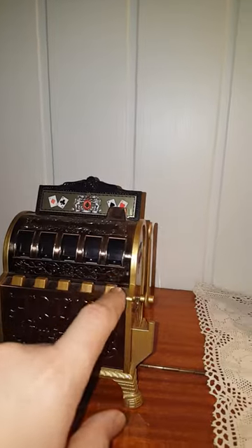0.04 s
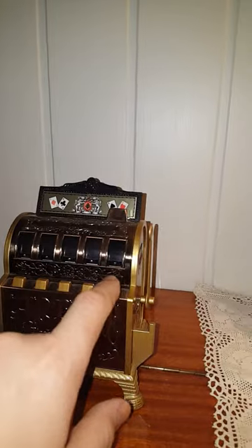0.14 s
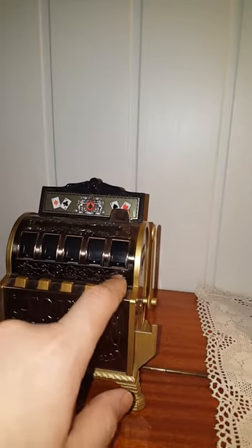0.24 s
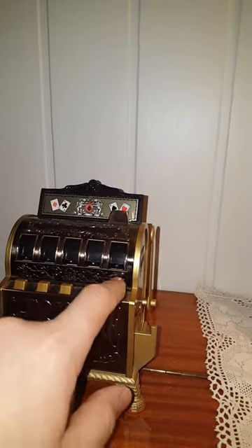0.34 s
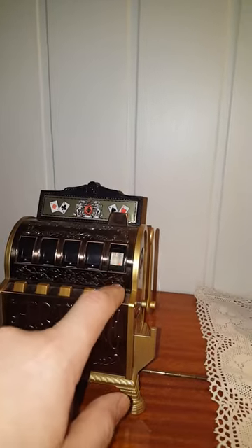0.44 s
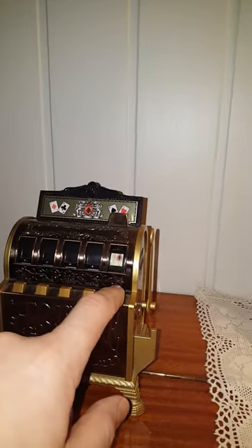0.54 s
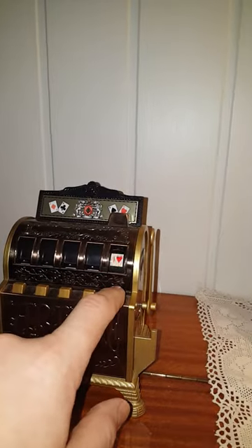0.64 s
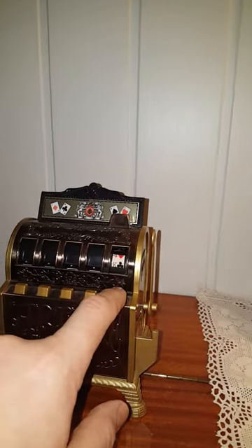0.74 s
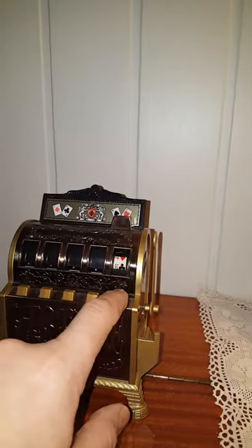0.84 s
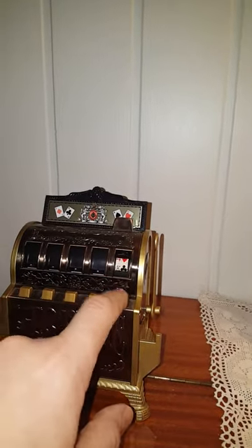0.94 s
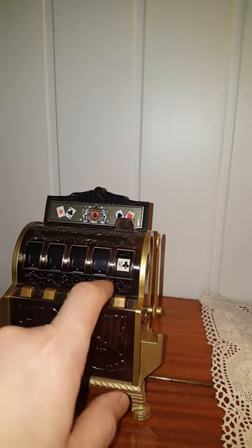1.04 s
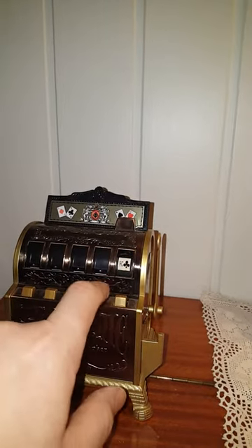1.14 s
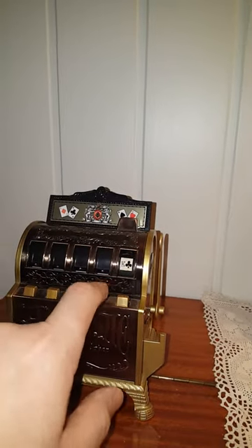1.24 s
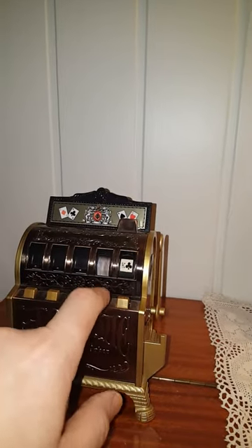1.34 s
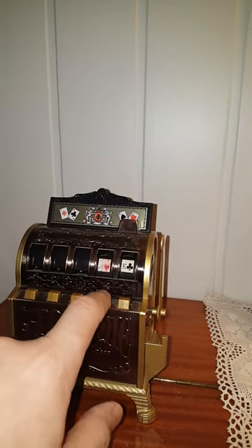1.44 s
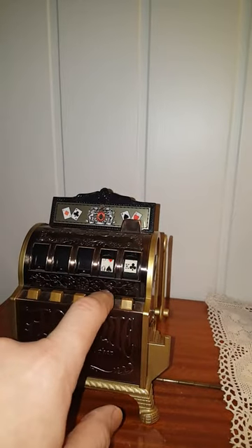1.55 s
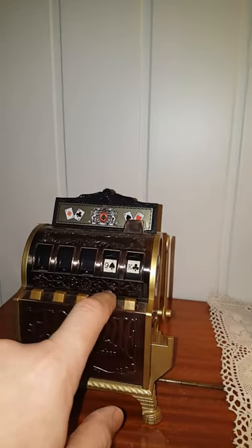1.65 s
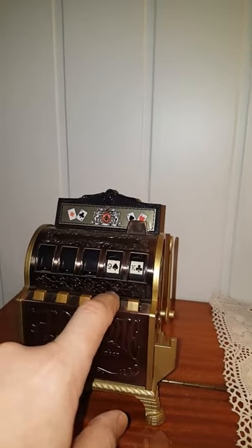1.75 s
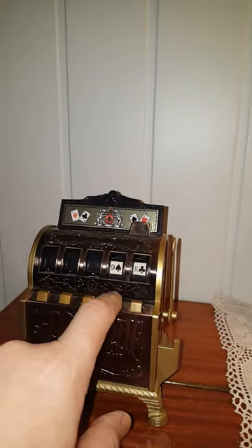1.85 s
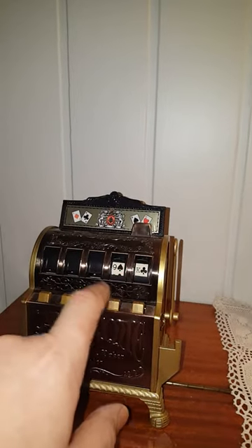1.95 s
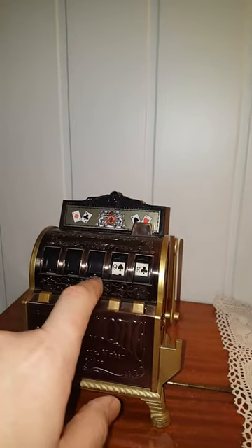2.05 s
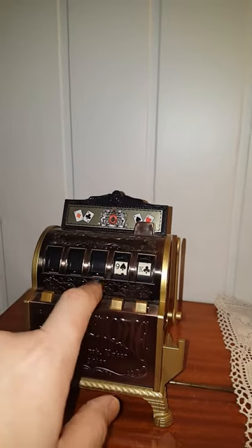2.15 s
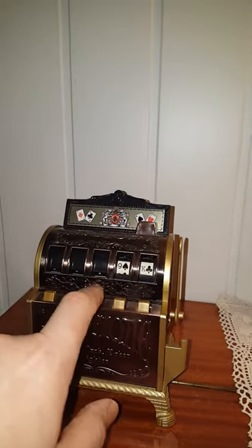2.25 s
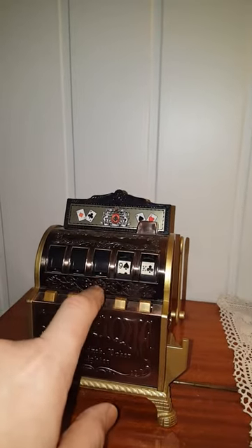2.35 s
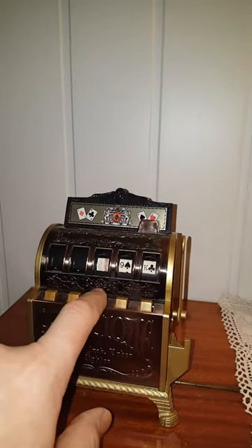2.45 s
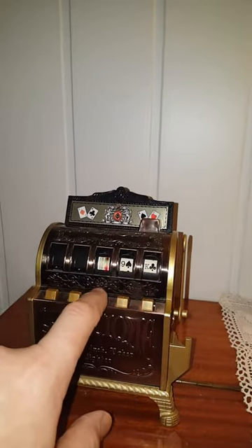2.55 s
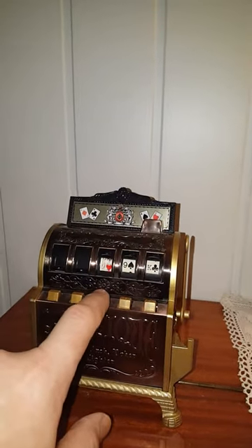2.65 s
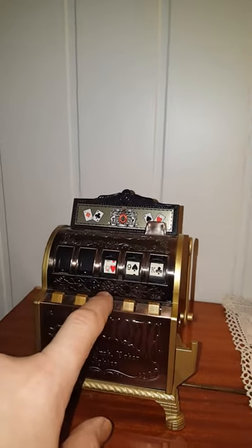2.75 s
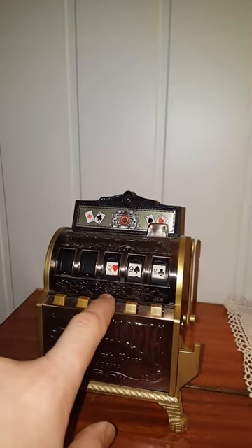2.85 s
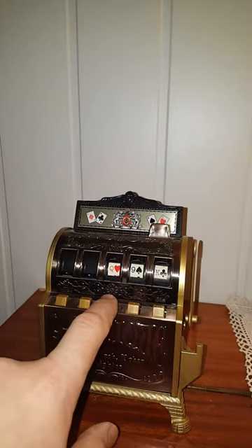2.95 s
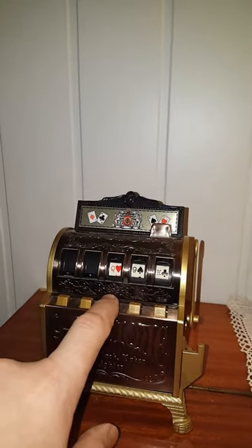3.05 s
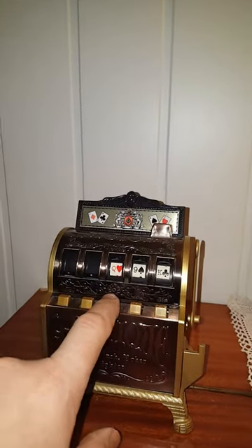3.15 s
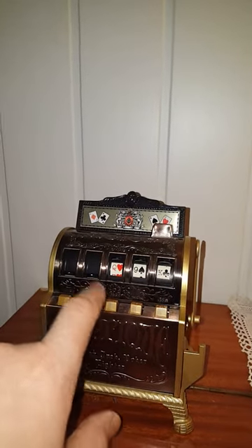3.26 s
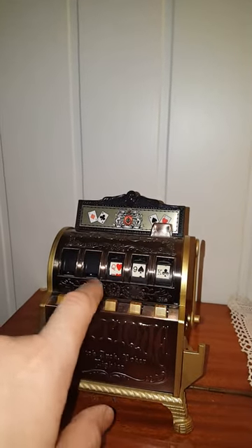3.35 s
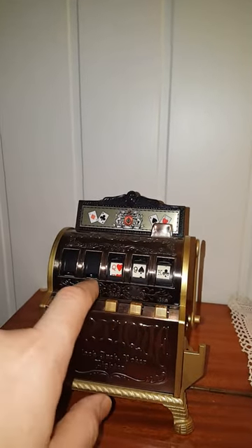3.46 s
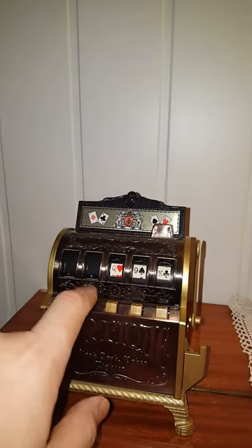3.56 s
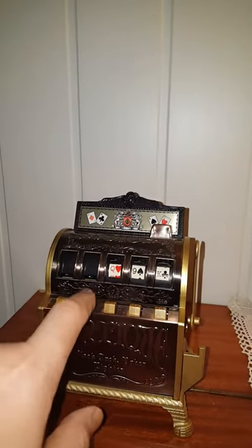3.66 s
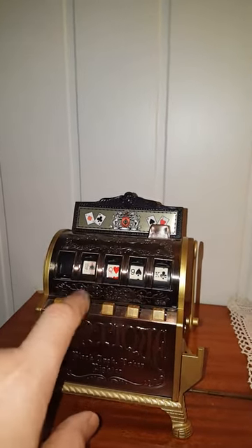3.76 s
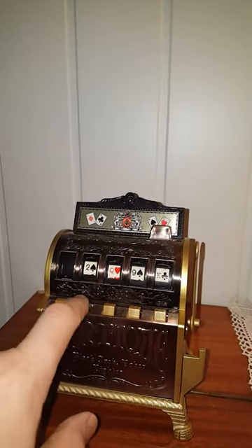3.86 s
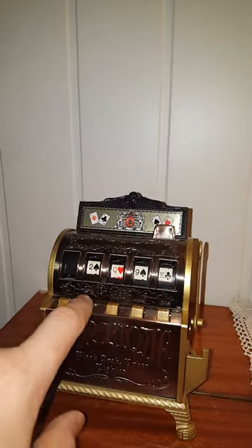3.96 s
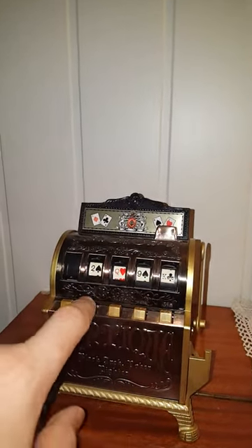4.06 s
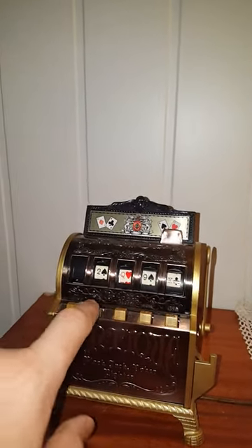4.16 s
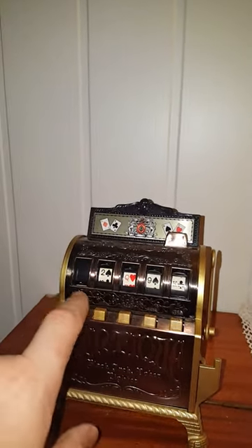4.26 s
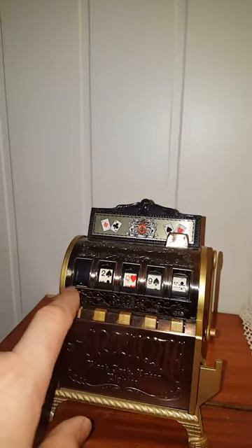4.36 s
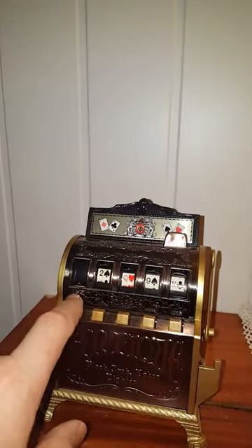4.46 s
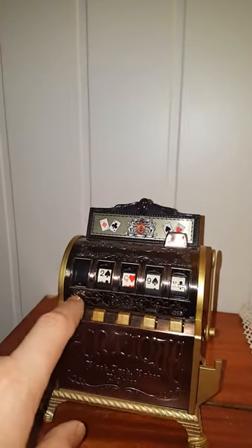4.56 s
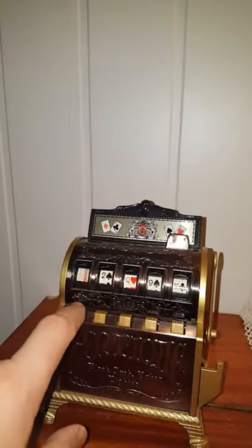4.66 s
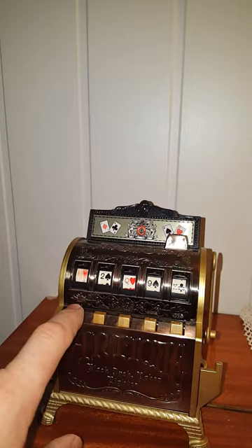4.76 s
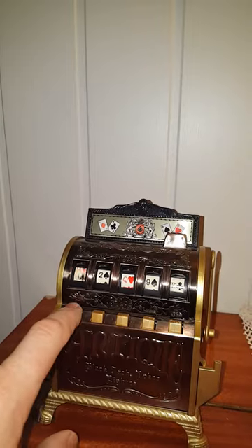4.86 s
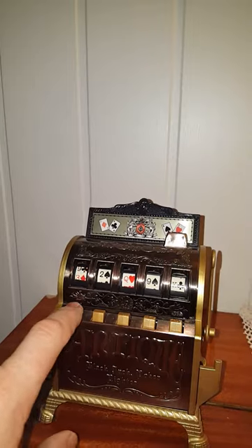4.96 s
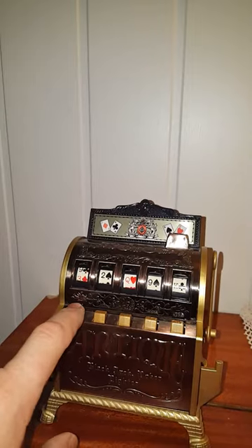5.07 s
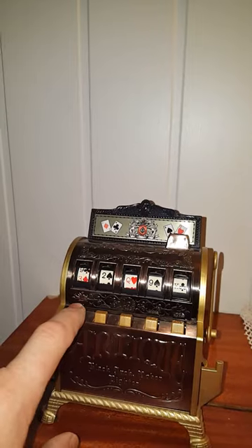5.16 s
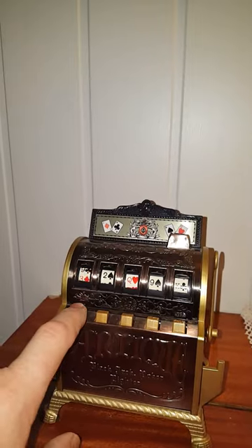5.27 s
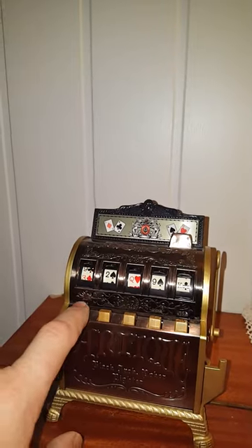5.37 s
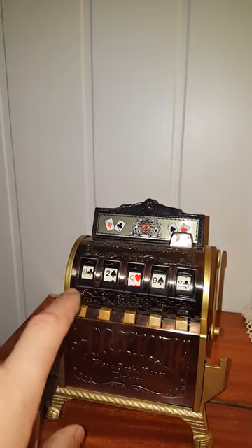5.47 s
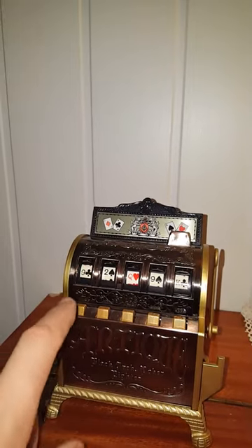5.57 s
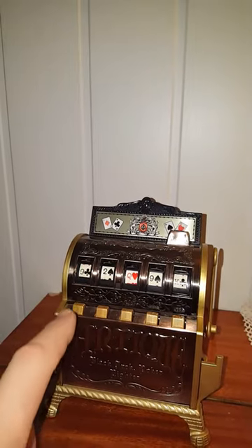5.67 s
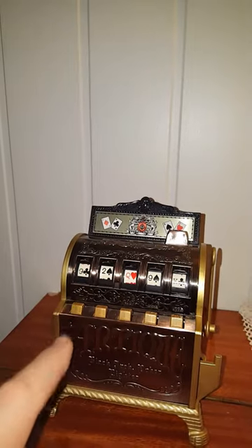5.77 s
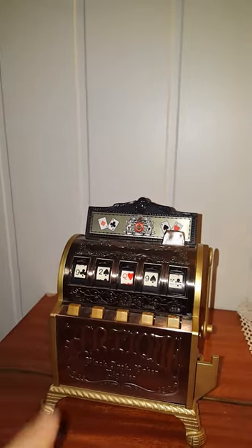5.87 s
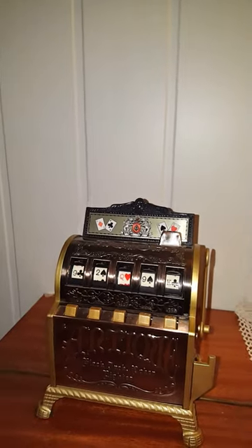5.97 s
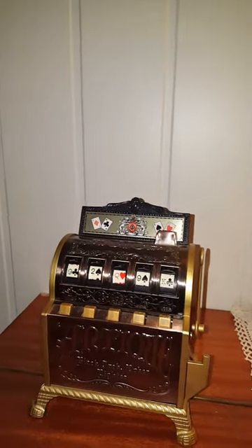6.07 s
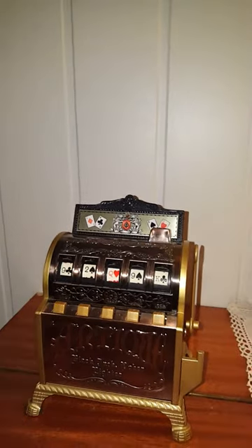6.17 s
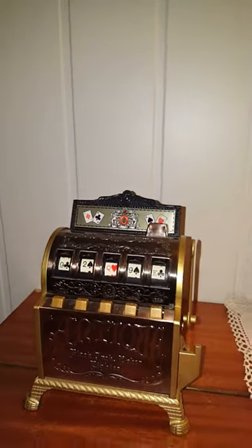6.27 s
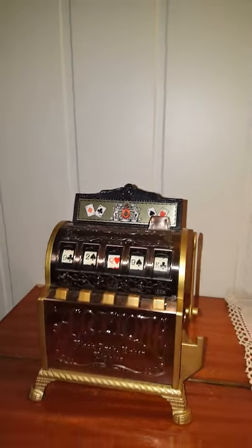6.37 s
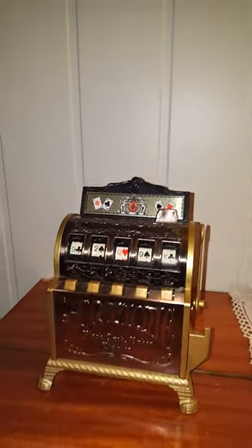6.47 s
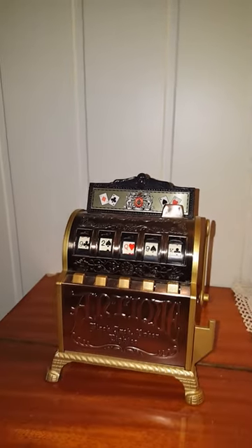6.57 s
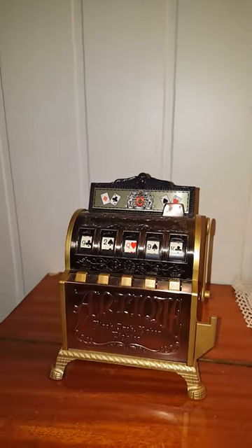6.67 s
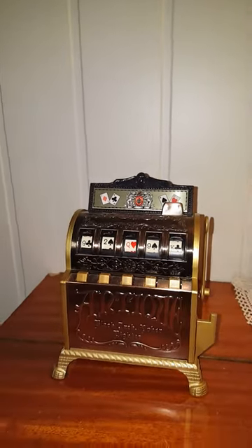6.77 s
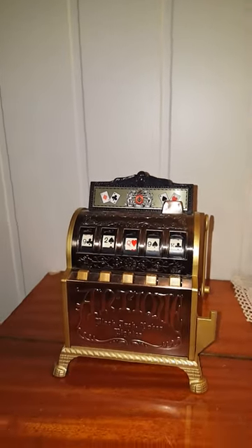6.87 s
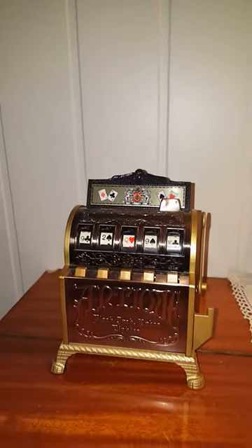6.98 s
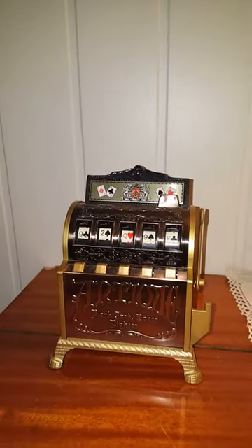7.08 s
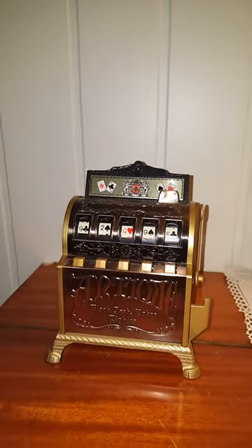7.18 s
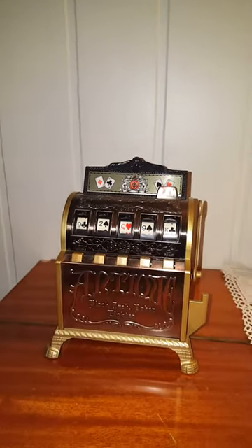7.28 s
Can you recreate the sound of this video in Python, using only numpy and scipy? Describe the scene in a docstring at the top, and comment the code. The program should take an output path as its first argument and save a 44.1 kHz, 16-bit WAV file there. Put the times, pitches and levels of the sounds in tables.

```python
"""In a small, quiet room, a toy poker machine stands on a wooden table. A finger presses its five
buttons in turn. Each press ticks, then a spring latch snaps and flicks a card reel into a rattling
spin; the button clacks back and stops it. The hollow case and the table top ring briefly.
A soft knock and a tiny tick follow.
In the tables, "fade" is the time a sound takes to die away by 60 dB."""
import sys
import numpy as np
from scipy import signal
from scipy.fft import rfft, irfft, next_fast_len
from scipy.io import wavfile
from scipy.ndimage import uniform_filter1d

SR = 44100
rng = np.random.default_rng(int(sys.argv[2]) if len(sys.argv) > 2 else 0)


def wav_record(signal):
    """Record a signal, one row per channel, as 16-bit PCM in the file named by sys.argv[1]."""
    frames = np.transpose(np.atleast_2d(signal))
    bounded = np.clip(frames, -1, 1)
    # unit amplitude maps onto the largest positive 16-bit level
    quanta = np.round(bounded * 32767).astype(np.int16)
    wavfile.write(sys.argv[1], SR, quanta)


N = 322949


# Button presses: snap t/s, level/dB, bass boost/dB, treble boost/dB, finger lands earlier by t/s,
# pawl level/dB, rebound delay t/s, rebound against the snap/dB
LATCH_SNAPS = [(0.4644, -16, -3, 2.5, .014, -37.5, 0.0049, -11),
               (1.3925, -18, -2, 6, .0395, -34.5, 0.013, -9.5),
               (2.423, -18.5, -8, 2.5, 0.028, -30.5, .0052, 0.5),
               (3.7252, -14.5, 0, 2.5, .031, -39.5, .0113, -5),
               (4.6899, -13.5, 0.5, 2, 0.023, -36.5, .0095, -6.5)]

def press_contacts():
    """The finger lands, the pawl (a small catch) slips, then the latch snaps and rebounds."""
    for s, db, bass_db, treble_db, touch_s, pawl_db, rebound_s, rebound_db in LATCH_SNAPS:
        # each contact: t/s, level/dB, bass boost/dB, treble boost/dB, fade/s
        yield s - touch_s, -43, -2, -8, .057  # finger
        yield s - .0128, pawl_db, -3, 0, .028  # pawl
        yield s, db, bass_db, treble_db, .032  # snap
        yield s + rebound_s, db + rebound_db, bass_db, treble_db, .032


# Button releases: clack t/s, level/dB, bass boost/dB, treble boost/dB, unsticks earlier by t/s,
# unsticking level/dB, seating delay t/s, seating against the clack/dB, seating fade/s
BUTTON_CLACKS = [(1.0405, -39, 4.5, -11.5, .043, -44, 0.021, -3, .06),
                 (1.946, -42.5, 2.5, -5, .012, -54, .016, 0, .1),
                 (3.256, -39.5, -0.5, -7, .023, -52.5, 0.02, -1, .05),
                 (4.244, -45, 2, -3.5, .009, -56.5, 0.012, -3, .032),
                 (5.453, -40, 1.5, 2, .057, -60, 0.028, 0, .11)]
# A button coming unstuck: bass boost/dB, treble boost/dB, fade/s
UNSTICK_TONE = (3, -7.5, .04)

def release_contacts():
    """The button comes unstuck, clacks back and settles into its seat with a duller chatter."""
    for s, db, bass_db, treble_db, unstick_s, unstick_db, seat_s, seat_db, seat_fade_s in BUTTON_CLACKS:
        yield s - unstick_s, unstick_db, *UNSTICK_TONE
        yield s, db, bass_db, treble_db, .043  # clack
        yield s + seat_s, db + seat_db, bass_db + 4, treble_db - 6, seat_fade_s


# Lone ticks of loose parts: t/s, level/dB, bass boost/dB, treble boost/dB
LOOSE_TICKS = [(1.139, -61, 10, -12.5), (2.031, -59, 5, -8.5), (3.808, -37.5, 2, 6.5), (4.003, -63, 1, -8),
               (6.286, -70, 0, 14.5)]

def buttons(tick_fade_s=.033):
    """Each contact pushes the case once, shakes the button and makes the loose parts chatter."""
    force, t = np.zeros((2, N)), np.arange(SR // 8) / SR
    push = soft_filter(1. * (t == 0), 1200, "low")
    ticks = [(*row, tick_fade_s) for row in LOOSE_TICKS]
    for s, db, bass_db, treble_db, fade_s in [*press_contacts(), *release_contacts(), *ticks]:
        # a longer chatter also builds up more slowly
        chatter = soft_filter(burst(t, fade_s, rise_s=.05 * fade_s, apart_hz=1990), 900, "high")
        shudder = soft_filter(burst(t, fade_s, rise_s=.0015, apart_hz=1400), 610, "low")
        contact = gain(-5.5) * push + gain(-3) * shudder + chatter
        tone = [(800, bass_db), (1700, 0), (3600, 0), (8000, treble_db)]
        add(force, s, gain(db) * colour(contact, tone))
    return force


# Notes of a button's return spring: f/Hz, level against the clack/dB, fade/s
SPRING_NOTES = [(475, -8, .24), (590, -4, .14)]

def button_returns(slide_width_s=.016, fastest_after_s=.009):
    """A released button scrapes up its slot, and the clack sets its spring ringing."""
    force, t = np.zeros((2, N)), np.arange(SR // 3) / SR
    speed = np.exp(-((t - 2 * slide_width_s) / slide_width_s) ** 2)
    for s, db, *_ in BUTTON_CLACKS:
        rub = stereo_noise(len(t), 1400) * jolts(len(t), rough_db=3) * speed / np.linalg.norm(speed)
        scrape = gain(db - 5) * soft_filter(rub, 2600, "low", order=1)
        add(force, s + fastest_after_s - 2 * slide_width_s, scrape)
        for (hz, note_db, fade_s), detune in zip(SPRING_NOTES, rng.standard_normal(len(SPRING_NOTES))):
            note = np.sin(2 * np.pi * hz * (1 + .025 * detune) * t) * fade(t, fade_s) * rise(t, .006)
            add(force, s, ring_gain(db + note_db, fade_s) * note)
    return force


# One spin per press, with levels relative to each other: settles after t/s, rattle level/dB,
# rattle fade/s, treble boost/dB, catch level/dB, coasting level/dB, buzz level/dB, table thump/dB
REEL_SPINS = [(0.14, -29, 0.5, 0, -61, -70, -45.5, -37), (.185, -29.5, 0.52, -5.5, -65, -64.5, -56, -36.5),
              (0.25, -30, 0.74, -5, -56.5, -67.5, -41.5, -40),
              (0.15, -29.5, .33, 3.5, -73, -70, -46.5, -49.5),
              (0.19, -32.5, 0.47, -2, -71, -69, -55.5, -42)]
# Notes of a reel on its axle: f/Hz, strength of the ring/dB, fade/s
REEL_NOTES = [(480, -0.5, .13), (1955, 4, .06), (2780, -5, 0.04), (4000, 0.5, 0.055)]

def reels(flick_delay_s=.016, catch_lead_s=.015, catch_width_s=.011, axle_hz=783):
    """A flicked reel rattles on its axle, sings as it settles and whirrs until its button lets go."""
    force = np.zeros((2, N))
    for (snap_s, *_), (stop_s, *_), spin in zip(LATCH_SNAPS, BUTTON_CLACKS, REEL_SPINS):
        settle_s, db, fade_s, treble_db, catch_db, coast_db, buzz_db, _ = spin
        start_s = snap_s + flick_delay_s
        t = np.arange(int((stop_s - start_s) * SR)) / SR
        ticks = stereo_noise(len(t), 1100) * jolts(len(t), rough_db=3.5) * rise(t, .003)
        wobble = gain(db) * fade(t, fade_s) * fade(np.maximum(t - settle_s, 0), .17)
        # the catch rubs the reel's rim and makes it sing
        catch = ticks * gain(catch_db) * np.exp(-((t - settle_s + catch_lead_s) / catch_width_s) ** 2)
        rim = gain(12) * (ring(catch, REEL_NOTES) - catch)
        tone = [(250, -.33), (500, -.37), (1000, -1.1), (2200, 2),
                (8000, treble_db), (15000, treble_db - 3.5)]
        rattle = ring(colour(ticks * wobble + catch, tone), REEL_NOTES)
        whirr = gain(coast_db) * soft_filter(ticks, 1600, "low", order=1) * fade(t, 1.9)
        hum = gain(-81.5) * np.sin(2 * np.pi * axle_hz * t) * jolts(len(t), rough_db=4, size=2001)
        add(force, start_s, rattle + rim + whirr + hum + gain(buzz_db) * reel_buzz(t))
    return gain(-31.5) * force


def reel_buzz(t, from_hz=530, to_hz=300, slowing_s=.07, peak_s=.04):
    """A freshly flicked reel judders in its bearing, falling in pitch as it runs free."""
    glide_hz = to_hz + (from_hz - to_hz) * np.exp(-t / slowing_s)
    hz = glide_hz * jolts(len(t), rough_db=.33, size=201)
    swell = (t / peak_s) ** 2 * np.exp(1 - (t / peak_s) ** 2)
    return np.sin(2 * np.pi * np.cumsum(hz) / SR) * swell * jolts(len(t), rough_db=2, size=301)


# Tone of each button's spot on the case: in use from t/s, then level/dB at each of the five SPOT_HZ
BUTTON_SPOTS = [(0, -5, 2, 0.87, -3, -2), (1.3, 5.5, -3, -0.24, -2.5, -1), (2.3, 5.5, 0, 1, -4, -1.5),
                (3.6, -3, 2, 1.48, 1, 1.5), (4.6, -2, -0.5, -1.2, 0.5, -0.5)]
# Pitches at which the spots differ: f/Hz
SPOT_HZ = [342, 476, 890, 1190, 1920]

def button_spots(force):
    """Each button shakes the case from its own spot, which gives it its own tone."""
    out, starts = np.zeros((2, N)), [int(row[0] * SR) for row in BUTTON_SPOTS]
    for (s, *levels_db), start, end in zip(BUTTON_SPOTS, starts, starts[1:] + [N]):
        tone = sorted([(200, 0), (640, 0), (3000, 0), *zip(SPOT_HZ, levels_db)])
        add(out, s, colour(force[:, start:end], tone))
    return out


# Notes of the case and its works: f/Hz, strength of the ring/dB, fade/s
CASE_NOTES = [(371, 5.5, .18), (476, 7.5, 0.28), (586, 6.5, .1), (637, 0.5, 0.3), (767.8, 4.5, 0.16),
              (838, 1, .06), (906, -2.5, 0.036), (1076, -4.5, 0.093), (1250, -1.5, 0.27), (1410, -1, .12),
              (1502, 2.5, .06), (1906, 2.5, 0.029), (2020, -4.5, 0.088), (2787, -1, .04), (3195, -3, 0.094),
              (3490, -2.5, .06), (3980, -1.5, .08), (4680, -1, 0.026), (5902, 0.5, 0.08), (6220, -2, 0.032),
              (7970, -1, 0.061), (7960, -1, .05), (8900, 0, .05), (9500, -3, 0.0095), (14016, -1, 0.086)]
# Overall tone of the case when struck: f/Hz, level/dB
CASE_TONE = [(40, 10), (110, 21.5), (230, 18), (320, 26.5), (430, 36.5), (800, 34), (1150, 27.5),
             (1900, 31.5), (2400, 28.5), (3200, 31), (4300, 25.5), (9000, 24.5), (12000, 21.5),
             (16000, 19.5)]

def hollow_case(force):
    """The case rings at every contact; small springs and levers add many short, high notes."""
    small_parts = [(3500 + 12000 * pitch, -8 + 8 * strength, .03 + .09 * length)
                   for pitch, strength, length in rng.random((45, 3))]
    return colour(ring(force, CASE_NOTES + small_parts), CASE_TONE)


# Low notes of the table top: f/Hz, relative level/dB, fade/s, head start of the right channel/rad
TABLE_NOTES = [(56, -8.5, 0.084, 1.5), (78.4, 0, 0.3, -1.2), (100, -2.5, 0.73, 1.3), (124, 0, 0.25, 0.17),
               (158.6, 1.5, 0.4, 0.59)]

def table_top():
    """Each snap of a latch sends a low thump through the toy's feet into the table."""
    out, t = np.zeros((2, N)), np.arange(SR // 2) / SR
    for (snap_s, *_), (*_, thump_db) in zip(LATCH_SNAPS, REEL_SPINS):
        scatter = rng.standard_normal((len(TABLE_NOTES), 2))
        for (hz, db, fade_s, lead), (detune, swing) in zip(TABLE_NOTES, scatter):
            phase = 2 * np.pi * hz * (1 + .023 * detune) * t + np.array([[0], [lead]])
            note = np.sin(phase) * fade(t, fade_s) * rise(t, .002)
            add(out, snap_s, gain(thump_db + db + 1.4 * swing - 6) * note)
    return out


# Tone of the soft knock: f/Hz, relative level/dB
KNOCK_TONE = [(50, -12), (110, -7), (165, 4.5), (260, -5), (600, 1.5), (1500, 0.5), (3000, -2.5),
              (5200, -22), (7500, -14), (15000, -30)]

def soft_knock(at_s=5.9212, energy_db=-9):
    """A short, dry knock with a brief, dull after-sound."""
    out, t = np.zeros((2, N)), np.arange(SR // 4) / SR
    after = soft_filter(burst(t, .13, rise_s=.0018, apart_hz=1401), 2400, "low")
    crack = burst(t, .022, rise_s=.001, apart_hz=3000)
    knock = colour(1. * (t == 0) + gain(-2.5) * crack + gain(1.5) * after, KNOCK_TONE)
    add(out, at_s, gain(energy_db) * knock / np.linalg.norm(knock))
    return out


# Echo of the room: f/Hz, fade/s, level against the direct sound/dB
WALL_ECHO = [(101, 1, -4.5), (500, 0.26, -4.5), (1500, 0.41, -4.5), (4000, 0.28, -8), (9000, 0.31, -10.5),
             (16000, 0.16, -12)]

def room_echo(x):
    """Nearby walls send back a blur of echoes in which the highest treble dies first."""
    t = np.arange(int(SR * .7)) / SR
    noise, hz = rfft(stereo_noise(len(t), 1000)), np.fft.rfftfreq(len(t), 1 / SR)
    octave, tail = np.log2(np.clip(hz, 64, 16384)), 0
    for k in range(6, 15):
        band = irfft(noise * np.maximum(1 - abs(octave - k), 0), len(t))
        envelope = fade(t, look_up(2 ** k, WALL_ECHO)) * (1 - np.exp(-(t / .011) ** 2))
        level = gain(look_up(2 ** k, WALL_ECHO, column=2))
        tail = tail + level * band * envelope / np.linalg.norm(envelope)
    return convolve(x, tail)


# Tone of the room's hush: f/Hz, relative level/dB
HUSH_TONE = [(15, -37.5), (25, -14.5), (49, 1.5), (113, -6.5), (144, 3), (164, -8), (193, -5), (281, -5),
             (378, -2), (1140, -15), (2230, -18), (2920, -23.5), (3440, -23), (7100, -36), (15500, -36.5)]
# Loudness of the hush over time: t/s, level/dB
HUSH_LEVEL = [(0, -60.5), (2.2, -61), (3.099, -63.5), (3.5, -61), (4.1, -67), (4.5, -65), (5.201, -67.5),
              (5.8, -60.5), (7.3, -62)]

def room_hush():
    """Faint, low background noise slowly swells and sinks."""
    hush = colour(stereo_noise(N, 18, spread=.53), HUSH_TONE)
    level_db = np.interp(np.arange(N) / SR, *np.transpose(HUSH_LEVEL))
    return hush / hush.std() * gain(level_db)


def gain(db):
    """Turn decibels into a multiplier."""
    return 10 ** (np.asarray(db) / 20)


def fade(t, fade_s):
    """Die away, reaching 60 dB down at fade_s."""
    return np.exp(-np.log(1000) * t / fade_s)


def rise(t, rise_s):
    """Climb smoothly from 0 towards 1."""
    return 1 - np.exp(-t / rise_s)


def add(track, s, sound):
    """Mix a sound in at s seconds."""
    start = int(s * SR)
    track[:, start:start + sound.shape[-1]] += sound[..., :N - start]


def look_up(hz, points, column=1):
    """Read between a table's rows, giving each octave equal room."""
    points = np.array(points, float)
    return np.interp(np.log(np.maximum(hz, 1)), np.log(points[:, 0]), points[:, column])


def convolve(x, response):
    """Filter both channels, keeping the length."""
    return signal.fftconvolve(np.atleast_2d(x), np.atleast_2d(response), axes=1)[:, :x.shape[-1]]


def colour(x, points, size=4096):
    """Shape the tone along a curve of (f/Hz, level/dB) points."""
    cepstrum = irfft(np.log(gain(look_up(np.fft.rfftfreq(size, 1 / SR), points))))
    # fold the filter so that nothing sounds before the hit
    cepstrum[1:size // 2] *= 2
    cepstrum[size // 2 + 1:] = 0
    return convolve(x, irfft(np.exp(rfft(cepstrum))))


def soft_filter(x, hz, keep, order=2):
    """Keep the "low" or "high" side of hz, with a gentle slope."""
    return signal.sosfilt(signal.butter(order, hz, keep, fs=SR, output="sos"), x)


def ring_gain(db, fade_s):
    """Starting height of a note of strength db: a longer ring starts lower."""
    return gain(db) * 2 * np.log(1000) / (fade_s * SR)


def ring(x, notes):
    """Let a sound set off ringing notes: f/Hz, strength/dB, fade/s."""
    t = np.arange(SR // 2) / SR
    response = 1. * (t == 0)
    for hz, db, fade_s in notes:
        response += ring_gain(db, fade_s) * fade(t, fade_s) * np.cos(2 * np.pi * hz * t)
    return convolve(x, response)


def stereo_noise(count, apart_hz, spread=1):
    """White noise: left and right are alike in the bass and drift apart above apart_hz."""
    size = next_fast_len(count)
    mid, side = rfft(rng.standard_normal((2, size)))
    hz = np.fft.rfftfreq(size, 1 / SR)
    share = spread * hz / np.hypot(hz, apart_hz)
    left_right = mid + share * side * np.array([[1], [-1]])
    return irfft(left_right / np.hypot(1, share), size)[:, :count]


def jolts(count, rough_db, size=101):
    """A multiplier that jumps about at random, each jolt about size samples long."""
    return gain(rough_db * np.sqrt(size) * uniform_filter1d(rng.standard_normal(count), size))


def burst(t, fade_s, rise_s, apart_hz):
    """A fading cloud of tiny impacts, with a total energy of about 1."""
    envelope = fade(t, fade_s) * rise(t, rise_s)
    return stereo_noise(len(t), apart_hz, spread=.99) * envelope / np.linalg.norm(envelope)


def scene(right_louder_db=3):
    """The machine stands close by, a little louder on the right."""
    machine = hollow_case(button_spots(buttons() + button_returns() + reels()))
    knock = soft_knock()
    echo = room_echo(machine + gain(-8) * knock)  # the knock is nearer, so it has less echo
    balance = gain(np.array([[-right_louder_db], [right_louder_db]]) / 2)
    return (machine + knock + echo + table_top() + room_hush()) * balance


def record(dry, top_hz=16000):
    """Round off the loudest peaks and cut the highest treble."""
    ceiling = gain(.34)
    rounded = ceiling * np.tanh(dry / ceiling)
    return signal.sosfilt(signal.ellip(8, .2, 70, top_hz, fs=SR, output="sos"), rounded)


dry = scene()
out = record(dry)
wav_record(out)
```